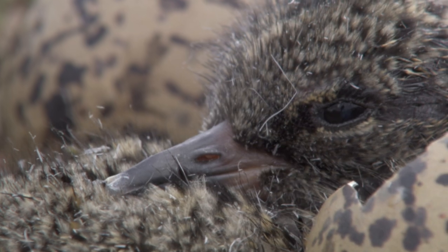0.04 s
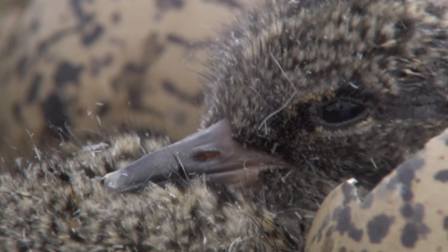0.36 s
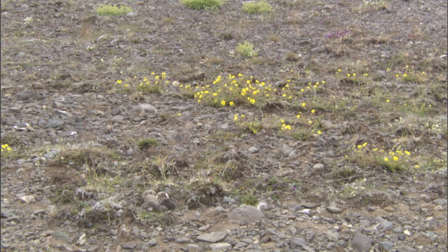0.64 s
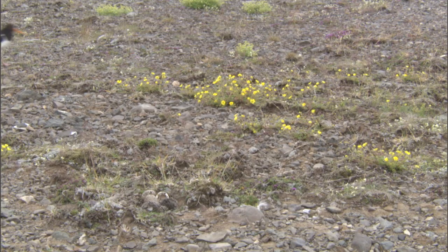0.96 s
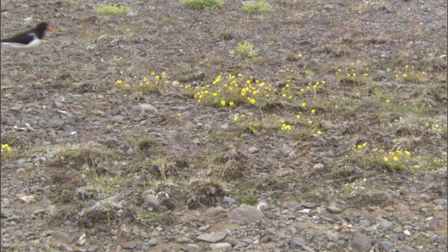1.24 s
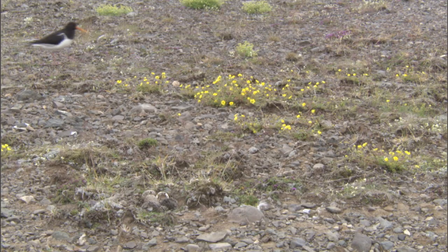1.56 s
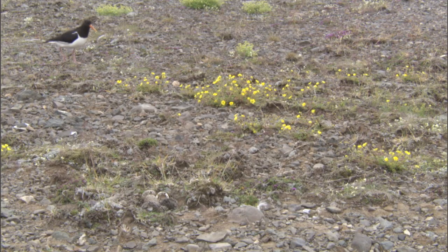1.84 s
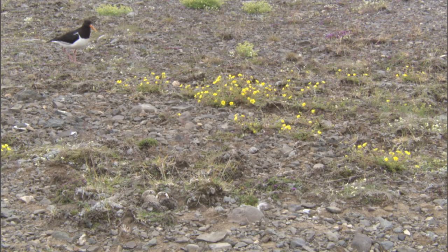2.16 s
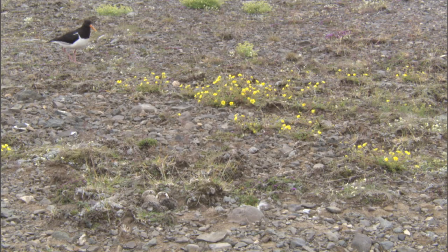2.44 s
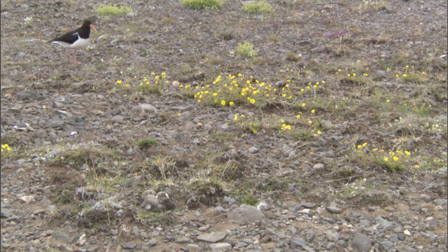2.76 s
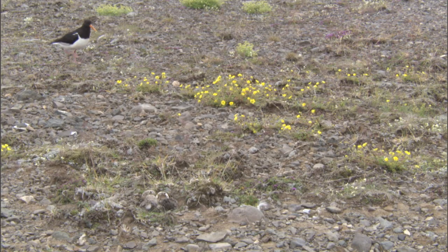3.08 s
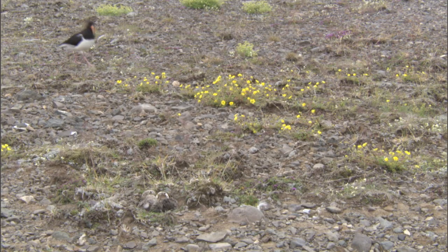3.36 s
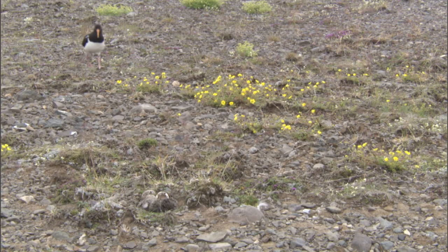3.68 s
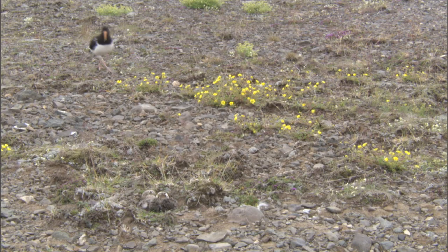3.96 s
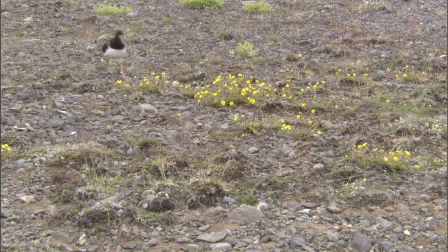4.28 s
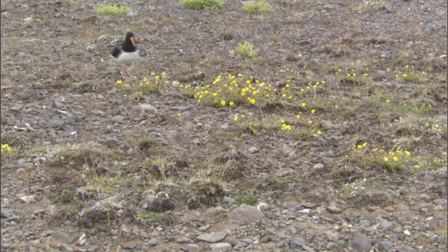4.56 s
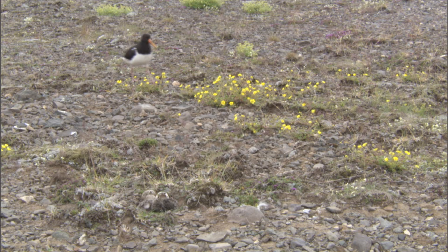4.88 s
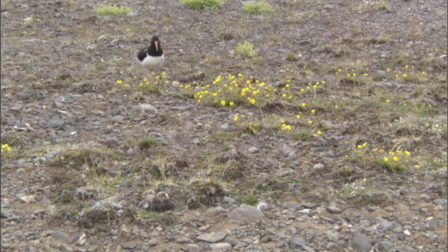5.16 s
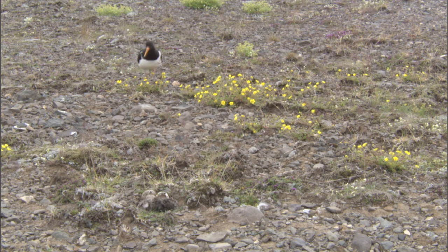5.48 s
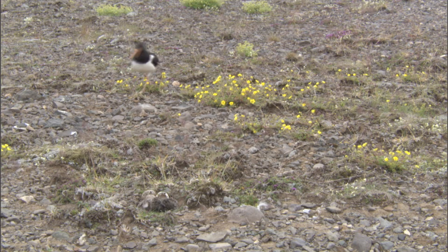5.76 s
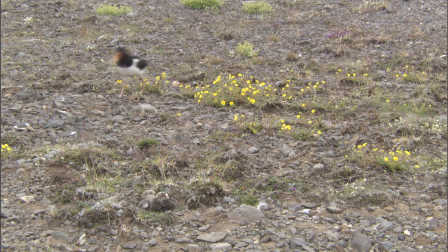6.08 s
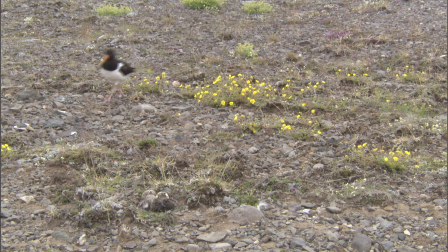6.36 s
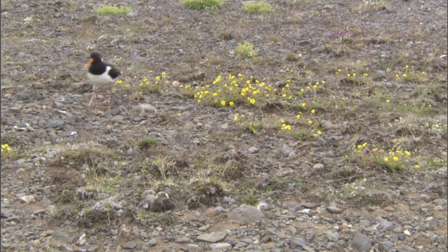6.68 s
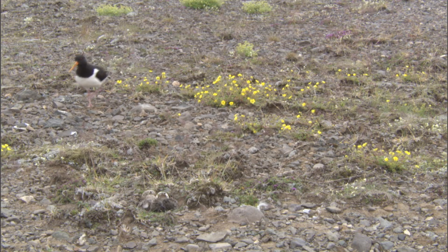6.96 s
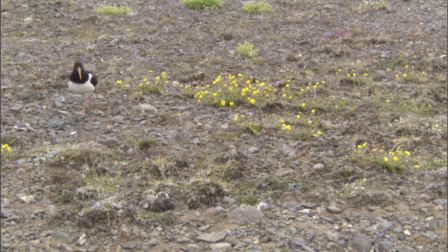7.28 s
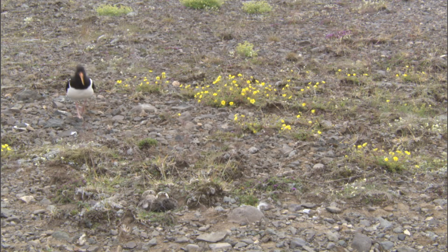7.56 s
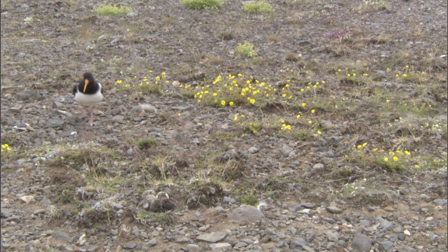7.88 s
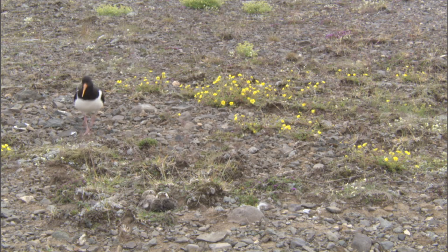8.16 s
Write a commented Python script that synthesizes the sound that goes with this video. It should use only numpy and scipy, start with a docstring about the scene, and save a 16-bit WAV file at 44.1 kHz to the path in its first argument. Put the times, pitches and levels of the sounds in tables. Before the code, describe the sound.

Outdoors on open gravel, a chick peeps and trills softly, with a couple of short bird yelps and one dull low thump. Then an oystercatcher close to the microphone gives eight sharp, high alarm calls, spaced out and growing louder until the last ones overload slightly. Other birds call and whistle faintly farther off, and wind rumbles on the microphone throughout.

```python
"""An oystercatcher on open gravel, close to the microphone, gives sharp 'kleep' alarm calls.
Its chick peeps and trills, short yelps sound, and other birds call and whistle farther off; each
voice is a vibrating membrane, answered by the stony ground, and some turn briefly raspy.
Wind rumbles on the microphone and rushes over the gravel, and there is one dull low thump.
The loudest calls overload the microphone: its bias swings and the signal hits the rails."""
import sys
import numpy as np
from scipy import signal
from scipy.fft import rfft, irfft, next_fast_len
from scipy.io import wavfile
from scipy.ndimage import uniform_filter1d, map_coordinates

SR = 44100
rng = np.random.default_rng(int(sys.argv[2]) if len(sys.argv) > 2 else 0)


def generate_wav(sig):
    """Save sig (samples, or channels by samples) to the path in sys.argv[1] as 16-bit PCM at SR."""
    pcm = np.round(np.clip(np.atleast_2d(sig).T, -1, 1) * 32767).astype(np.int16)
    wavfile.write(sys.argv[1], SR, pcm)


N = 362943
TIME = np.arange(N) / SR

# Wind. Each row: time in seconds, buffeting of the microphone and rush over gravel in relative dB.
WIND_LEVELS = [(0.02, -28, -61.5), (0.2, -20, -61), (0.22, -24, -61.5), (0.57, -34, -60), (0.64, -19, -62),
               (0.68, -31.5, -61), (1.02, -41, -62), (2.39, -36, -62), (2.5, -31.5, -62), (3.55, -35, -60),
               (4.01, -27, -61.5), (4.3, -36, -61.5), (4.39, -21, -62), (4.53, -30, -61.5),
               (6.53, -29.5, -60), (6.94, -25, -61), (7.33, -34, -60.5), (7.38, -24, -60),
               (7.99, -32.5, -62), (8.2, -30, -60)]
# Colours of buffeting, rush, hiss and voice rasps. Each row: frequency in Hz, density in relative dB.
BUFFET_SPECTRUM = [(3, 4.5), (12, 5), (25, -3), (50, -15), (100, -29), (200, -48), (500, -68), (1500, -110)]
RUSH_SPECTRUM = [(30, -6), (120, 2.5), (250, -2.5), (500, -10.5), (1000, -17.5), (2000, -25), (8000, -50)]
HISS_SPECTRUM = [(100, -10), (1000, -4), (2800, 4.5), (4000, 1.5), (10000, -3), (15500, -7.5)]
RASP_SPECTRUM = [(1200, -25), (2800, -4), (3800, -4.5), (5000, -14), (8000, -35)]
# Short yelps. Each row: time of the top, rise and fall in seconds, top pitch in Hz,
# squareness of the arch as a power, level in dB.
YELP_NOTES = [(.008, .004, .032, 2560, 2, -54.5), (.424, .035, .04, 2920, 1.8, -23.5),
              (.638, .002, .017, 2530, 1.1, -15.5)]
# Rasps in the birds' voices. Each row: start in seconds, length in seconds, level in dB.
VOICE_RASPS = [(.01, .07, -57), (.255, .06, -54.5), (.32, .01, -53), (.345, .016, -54),
               (1.936, .018, -50.5)]
# The chick. Each row: start and length in seconds, top pitch in Hz, level in dB, trill depth 0 to 1.
CHICK_PEEPS = [(0.083, .17, 3488, -42.5, 0.87), (0.42, .041, 3680, -37.5, 0.1),
               (0.603, 0.057, 3515, -44, 0.16), (1.862, 0.047, 3170, -55, 1), (1.98, .135, 3130, -51, 1),
               (6.439, 0.049, 3330, -51.5, 0.01), (6.985, 0.044, 3370, -46.5, 0.2),
               (7.368, 0.049, 3360, -51, 0.12)]
# A wader in the distance. Each row: start in seconds, level in dB.
WADER_WHISTLES = [(.64, -61), (1.745, -61.5), (2.006, -57), (4.098, -61), (4.35, -57), (6.04, -55),
                  (6.302, -53)]
# The shape of its whistle. Each row: time from the start in seconds, pitch in Hz, gain in dB.
WHISTLE_SHAPE = [(-.014, 3002, -10), (0, 3376, 6), (.01, 3140, 2), (.024, 2576, 3.5), (.042, 2415, 0.5),
                 (.08, 2405, -2), (.125, 2464, -2), (.16, 2416, -7)]
# The oystercatcher's alarm. Each row: onset, register break, release and length of the closing fall
# in seconds, start and top pitch in Hz, level in dB, lateness of the rise as a power.
ALARM_CALLS = [(1.3195, 1.341, 1.372, .018, 2260, 3071, -6.4, 1.1),
               (3.2162, 3.233, 3.264, .017, 2260, 3050, -5, 1.0),
               (3.862, 3.886, 3.92, .018, 2329, 3055, -2.8, 1.8),
               (4.6703, 4.6867, 4.733, .016, 2345, 3073, -4.3, 2.4),
               (5.3335, 5.357, 5.409, .016, 2427, 3114, -2, 3.8),
               (6.029, 6.060, 6.096, .02, 2227, 3072, -1.2, 1.7),
               (7.076, 7.101, 7.135, .005, 2330, 3078, 2, 1.6),
               (7.699, 7.723, 7.770, .014, 2379, 3068, 4, 4.5)]
# Its overtones. Each row: harmonic number, dB against the fundamental in the low and high register.
ALARM_OVERTONES = [(2, -12.5, -26.5), (3, -19.5, -39.5), (4, -30, -33), (5, -31, -42), (6, -35.5, -42.5)]
# Tiny contact notes around the flat. Each row: start in seconds, pitch in Hz, level in dB.
CONTACT_PIPS = [(1.688, 1997, -53), (3.408, 1920, -53), (4.589, 2047, -45.5), (6.488, 1963, -49.5)]
# Birds farther off. Each row: time of the top, rise and fall in seconds, top pitch in Hz,
# squareness of the arch as a power, level in dB, dip at the top in dB.
DISTANT_CALLS = [(1.943, .032, 0.034, 3670, 2.5, -28, 4), (2.254, .004, .034, 2840, 1.6, -43.5, 2),
                 (2.498, .061, .055, 4250, 3.4, -44, 4), (4.263, .051, 0.039, 3540, 1.5, -41.5, 0),
                 (5.148, 0.081, .082, 2555, 7, -38, 15), (5.64, .091, .068, 2603, 6, -38.5, 17),
                 (6.514, .004, .043, 4600, 1.05, -45.5, 11), (6.8, .01, .012, 2720, 4, -60, 0)]


def amp(db):
    """Decibels to gain."""
    return 10 ** (np.asarray(db) / 20)


def unit(x):
    """Scale to rms 1."""
    return x / np.sqrt(np.mean(x ** 2) + 1e-20)


def wobble(rate, size):
    """A smooth random curve, rate knots a second."""
    knots = rng.standard_normal(int(size * rate / SR) + 4)
    return map_coordinates(knots, [np.arange(size) * rate / SR])


def filtered(x, response):
    """Filter x by a response given as a function of Hz."""
    size = next_fast_len(N + SR)
    return irfft(rfft(x, size) * response(np.fft.rfftfreq(size, 1 / SR)), size)[:N]


def noise(spectrum):
    """Noise of rms 1 with the given (Hz, dB) colour."""
    knot_hz, db = np.transpose(spectrum)
    white = rng.standard_normal(N)
    return unit(filtered(white, lambda hz: amp(np.interp(np.log(hz + 1), np.log(knot_hz + 1), db))))


def add(out, t, sound):
    """Mix a sound in at the times t."""
    out[round(t[0] * SR):][:len(t)] += sound


def span(start, end):
    """Sample times of one note."""
    return np.arange(round(start * SR), max(round(end * SR), round(start * SR) + 2)) / SR


def arch(top_s, rise, fall, top_hz, start_hz, end_hz, squareness):
    """Times and pitch of an arched note, and the way from its top (0) to either end (1)."""
    t = span(top_s - rise, top_s + fall)
    away = np.clip(np.maximum((top_s - t) / rise, (t - top_s) / fall), 0, 1)
    foot_hz = np.where(t < top_s, start_hz, end_hz)
    return t, top_hz + (foot_hz - top_hz) * away ** squareness, away


def wind(buffet_lift_db=12, rush_lift_db=6, hiss_db=-67):
    """Gusts buffet the microphone and rush over the gravel above a steady hiss."""
    times, buffet_db, rush_db = np.transpose(WIND_LEVELS)
    gust = wobble(5.8, N)
    buffet = noise(BUFFET_SPECTRUM) * amp(np.interp(TIME, times, buffet_db) + buffet_lift_db + 2 * gust)
    rush = noise(RUSH_SPECTRUM) * amp(np.interp(TIME, times, rush_db) + rush_lift_db + .74 * gust)
    flutter = amp(2 * wobble(15, N))
    return buffet + rush * flutter + amp(hiss_db) * noise(HISS_SPECTRUM)


def syrinx(t, hz, db, overtones_db, jitter=.0011, shimmer_db=.8, edge_s=.0007):
    """A bird's vibrating membrane: a slightly unsteady tone and its overtones."""
    phase = 2 * np.pi * np.cumsum(hz * (1 + jitter * wobble(900, len(t)))) / SR
    tone = np.sin(phase) + sum(amp(level) * np.sin(k * phase) for k, level in enumerate(overtones_db, 2))
    fade = np.clip(np.minimum(t - t[0], t[-1] - t) / edge_s, 0, 1)
    return tone * fade * amp(db + shimmer_db * wobble(500, len(t)))


def yelps(start_hz=2420, end_hz=1847, end_fade_db=24.5):
    """Soft arched notes, rich in overtones, that fade toward both ends."""
    out = np.zeros(N)
    for top_s, rise, fall, top_hz, squareness, db in YELP_NOTES:
        t, hz, away = arch(top_s, rise, fall, top_hz, start_hz, end_hz, squareness)
        fade_db = end_fade_db * away ** 2.3 * np.where(t < top_s, .5, 1)  # the start is the firmer end
        add(out, t, syrinx(t, hz, db - fade_db, [-10, -17.5, -30.5, -45.5], jitter=.009, shimmer_db=1.5))
    return out


def voice_rasps(tail_s=.024, tail_db=-12.5, flutter_db=2.5):
    """Brief rasps in the birds' voices: around the chick's trill, at peep ends and in one distant call."""
    tails = [(start + length, tail_s, db + tail_db) for start, length, _, db, _ in CHICK_PEEPS]
    envelope = sum(amp(db) * np.sin(np.pi * np.clip((TIME - start) / length, 0, 1))
                   for start, length, db in VOICE_RASPS + tails)
    return envelope * amp(flutter_db * wobble(110, N)) * noise(RASP_SPECTRUM)


def chick(trill_hz=39.5):
    """Thin arched peeps that fade as they droop, some chopped into a trill."""
    out = np.zeros(N)
    for start, length, top_hz, db, trill in CHICK_PEEPS:
        t = span(start, start + length)
        droop = ((t - start) / length - .42) ** 2
        gaps = (.5 + .5 * np.cos(2 * np.pi * trill_hz * (t - start))) ** 4
        level_db = db - 26 * droop - 24 * trill * gaps
        add(out, t, syrinx(t, top_hz * (1 - .24 * droop), level_db, overtones_db=[-17]))
    return out


def wader_whistles():
    """Far out on the flat, each whistle flicks up and settles on a level pitch."""
    out = np.zeros(N)
    after, shape_hz, shape_db = np.transpose(WHISTLE_SHAPE)
    for start, db in WADER_WHISTLES:
        t = span(start + after[0], start + after[-1])
        hz = np.interp(t - start, after, shape_hz)
        add(out, t, syrinx(t, hz, db + np.interp(t - start, after, shape_db), overtones_db=[-30]))
    return out


def low_thump(start_s=.6345, peak_db=-12.5, decay_s=.003):
    """One short, dull low thump: a single one-sided pulse."""
    age = np.maximum(TIME - start_s, 0) / decay_s
    return amp(peak_db) * age * np.exp(1 - age)


def oystercatcher(lead_s=.0087, break_hz=2930, closing_hz=2577, closing_hz_per_s=52700,
                  scoop_db_per_hz=.0175, rasp_db=-45, crack_db=12, crack_s=.0021):
    """At close range, each kleep scoops up, breaks into a purer high register, arches and drops back."""
    out = np.zeros(N)
    for onset, break_s, release, fall, start_hz, top_hz, db, lateness in ALARM_CALLS:
        t = span(onset - lead_s, release + fall)
        rise = np.clip((t - onset) / (break_s - onset), 0, 1)
        hold = np.clip((t - break_s) / (release - break_s), 0, 1)
        lead_hz = np.interp(t, [onset - lead_s, onset], [1550, 1950])
        scoop_hz = start_hz + (break_hz - start_hz) * (.2 * rise + .8 * rise ** lateness)
        arch_hz = top_hz * (1 - .25 * np.abs(hold - .28) ** 2.4)  # peaks early in the hold, then sags
        fall_hz = closing_hz - closing_hz_per_s * (t - release)
        hz = np.select([t < onset, t < break_s, t < release], [lead_hz, scoop_hz, arch_hz], fall_hz)
        hz = uniform_filter1d(hz, size=50)
        swell_times = [onset - lead_s, onset - .001, onset + .00037, break_s,
                       release - .008, release, release + .003, release + fall]
        level_db = db + np.interp(t, swell_times, [-44, -23.5, 1.5, .5, 0, -3.5, -11, -33])
        level_db -= scoop_db_per_hz * (break_hz - scoop_hz)  # loudness follows the pitch up the scoop
        register_times = [break_s - .003, break_s + .002, release - .008, release + .002]
        high = np.interp(t, register_times, [0, 1, 1, 0])
        reedy_db = 4 * hold * (1 - high)  # the voice turns reedier as it closes
        overtones_db = [reedy_db + low_db + (high_db - low_db) * high
                        for _, low_db, high_db in ALARM_OVERTONES]
        # the voice cracks briefly at its onset and at the register break
        cracks = sum(np.exp(-((t - at) / crack_s) ** 2) for at in (onset, break_s))
        rasp = rng.standard_normal(len(t)) * amp(level_db + rasp_db + crack_db * cracks)
        add(out, t, syrinx(t, hz, level_db, overtones_db, jitter=.003, shimmer_db=.3) + rasp)
    return out


def contact_pips(length_s=.01):
    """Faint, tiny notes with an unsteady pitch and a strong octave."""
    out = np.zeros(N)
    for start, hz, db in CONTACT_PIPS:
        t = span(start, start + length_s)
        add(out, t, syrinx(t, hz, db, overtones_db=[-1, -14], jitter=.032, edge_s=.0031))
    return out


def distant_birds(foot_hz=2130, end_fade_db=11.5, dip_width=.4):
    """Nearly pure calls from farther off, most of them loudest on the shoulders of their arch."""
    out = np.zeros(N)
    for top_s, rise, fall, top_hz, squareness, db, dip_db in DISTANT_CALLS:
        t, hz, away = arch(top_s, rise, fall, top_hz, foot_hz, foot_hz, squareness)
        shape_db = -dip_db * np.exp(-(away / dip_width) ** 2) - end_fade_db * away ** 5
        add(out, t, syrinx(t, hz, db + shape_db, overtones_db=[-36]))
    return out


def ground(direct, slap_s=.0135, slap_db=-22, stones_db=-28, stones_t60_s=.07,
           flat_db=-51, flat_t60_s=.28, cutoff_hz=8000):
    """The ground adds one short slap, scatter from the stones and a very faint tail from the flat."""
    t = span(0, .36)
    tail = sum(amp(db) * unit(rng.standard_normal(len(t)) * amp(-60 * t / t60) * (t > .003))
               for db, t60 in [(stones_db, stones_t60_s), (flat_db, flat_t60_s)])
    scatter = signal.fftconvolve(direct, tail / np.sqrt(len(t)))[:N]
    slap = amp(slap_db) * np.pad(direct, (round(slap_s * SR), 0))[:N]
    return direct + filtered(scatter + slap, lambda hz: 1 / (1 + (hz / cutoff_hz) ** 2))


def scene():
    """Birds near and far over open gravel, heard from one microphone in the wind."""
    birds = oystercatcher() + yelps() + chick() + distant_birds() + wader_whistles() + contact_pips()
    return (ground(birds) + voice_rasps() + low_thump() + wind())[None]


def record(dry, rail=.74, swing_gain=1.8, bias_ceiling=.6, swing_hz=2.5, damping=.86,
           lag_hz=14, delay_s=.019, cutoff_hz=15900):
    """The microphone rectifies loud sound into a slow swing of its bias; the sum clips at the rails."""
    def recovery(hz):
        """The bias answers late, overshoots and settles back to zero."""
        p = 1j * hz / swing_hz
        highpass = p * p / (1 + damping * p + p * p)
        return highpass / (1 + 1j * hz / lag_hz) ** 2 * np.exp(-2j * np.pi * hz * delay_s)
    treble = filtered(dry[0], lambda hz: hz > 1000)
    rectified = np.minimum(np.abs(treble), rail)
    bias = swing_gain * filtered(np.tanh(2 * rectified), recovery)
    # the upward swing levels off softly; the undershoot can reach the lower rail and mute everything
    bias = -np.logaddexp(-20 * bias, -20 * bias_ceiling) / 20
    oversampled = signal.resample_poly(dry[0] + bias, 2, 1)
    clipped = oversampled / (1 + np.abs(oversampled / rail) ** 20) ** (1 / 20)
    mono = signal.resample_poly(clipped, 1, 2)
    return filtered(mono, lambda hz: 1 / (1 + (hz / cutoff_hz) ** 200))[None]


dry = scene()
out = record(dry)
generate_wav(out)
```